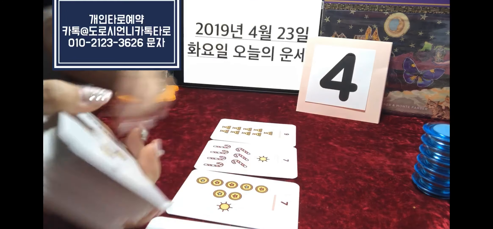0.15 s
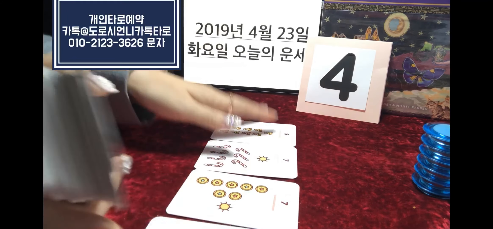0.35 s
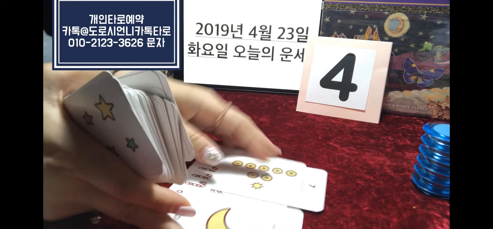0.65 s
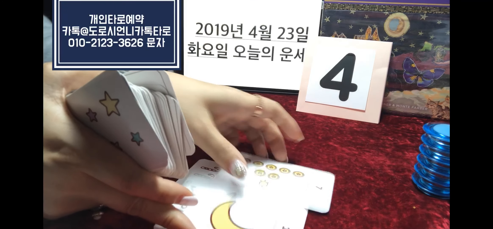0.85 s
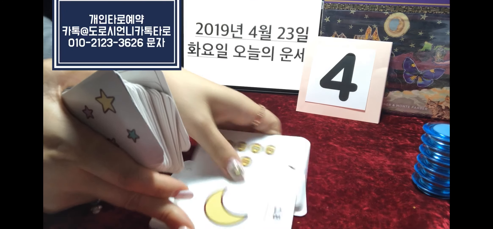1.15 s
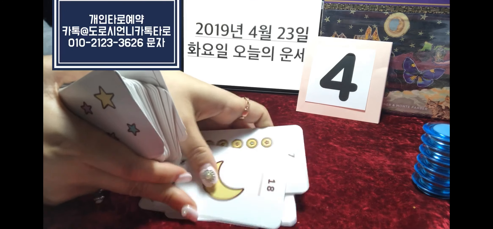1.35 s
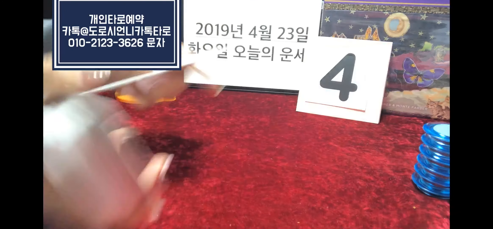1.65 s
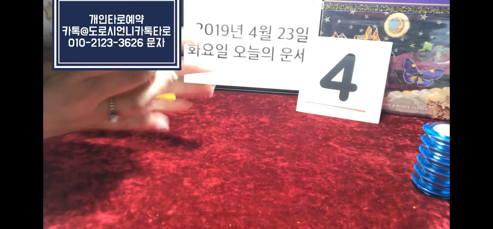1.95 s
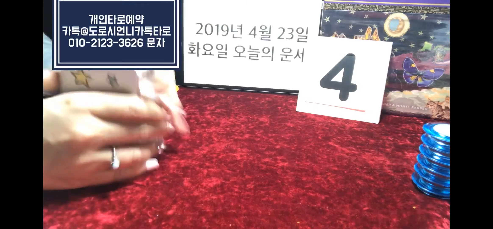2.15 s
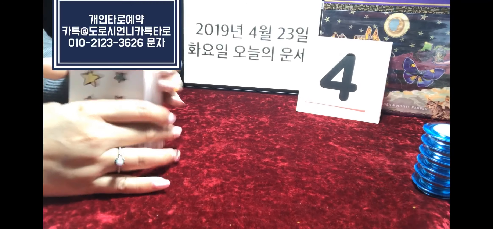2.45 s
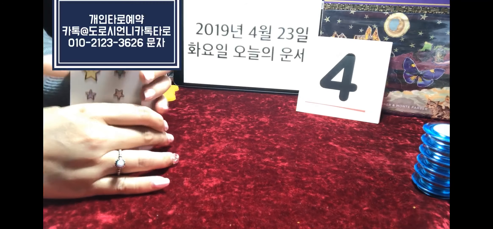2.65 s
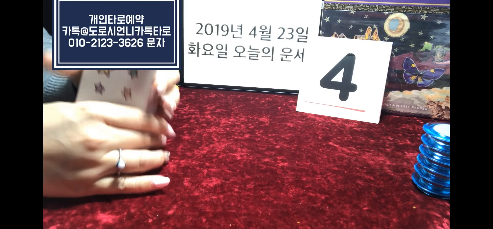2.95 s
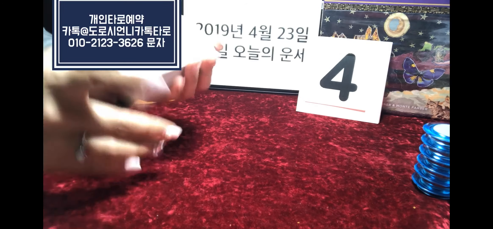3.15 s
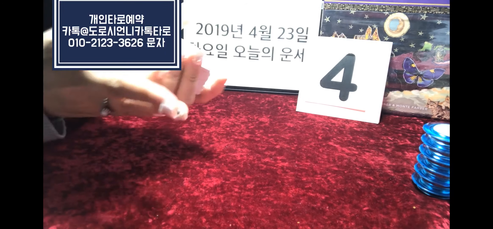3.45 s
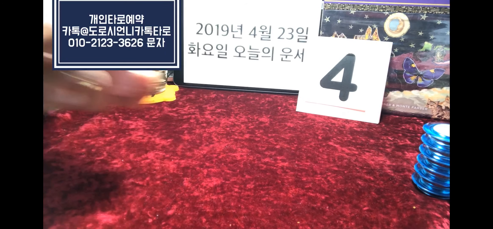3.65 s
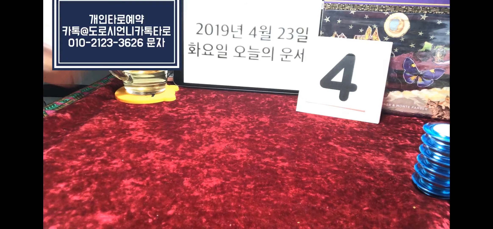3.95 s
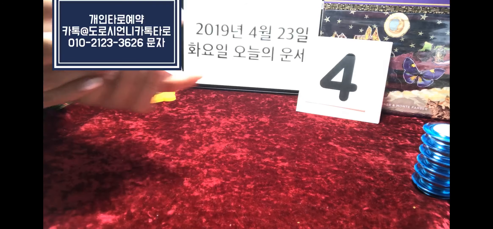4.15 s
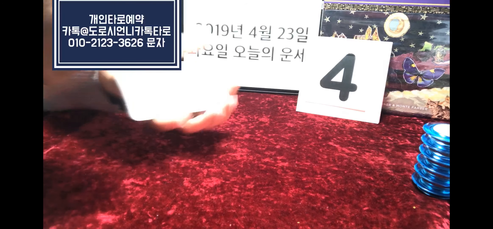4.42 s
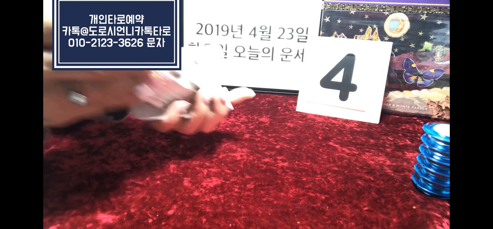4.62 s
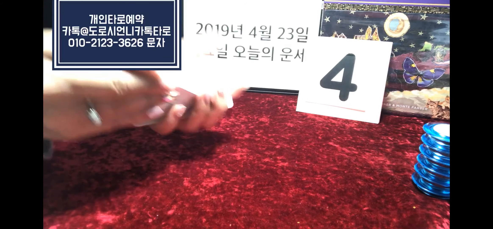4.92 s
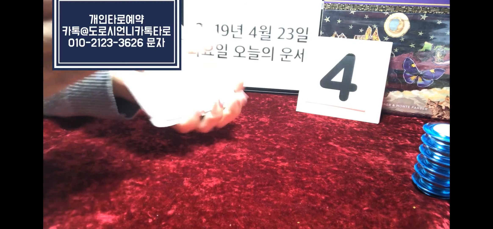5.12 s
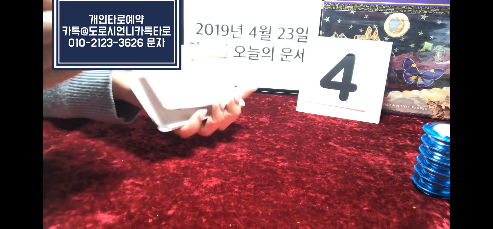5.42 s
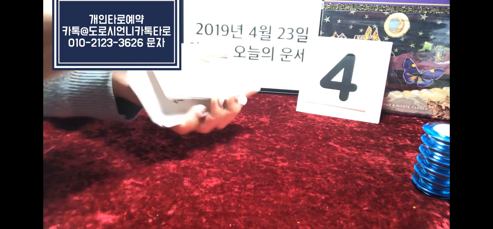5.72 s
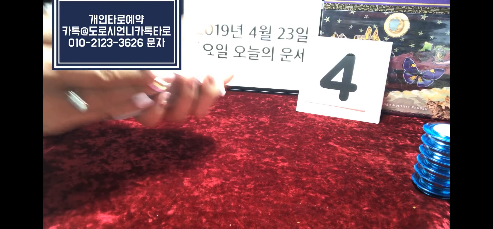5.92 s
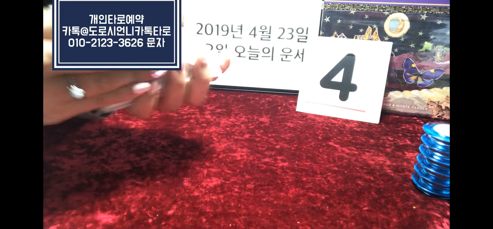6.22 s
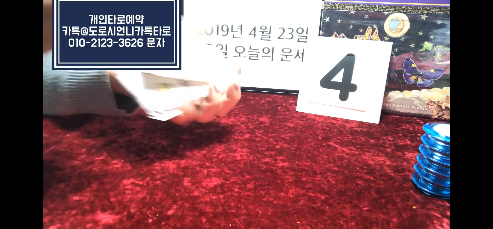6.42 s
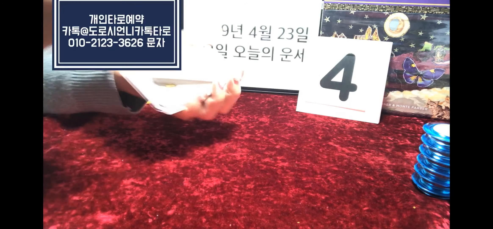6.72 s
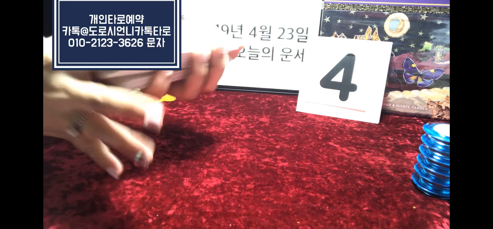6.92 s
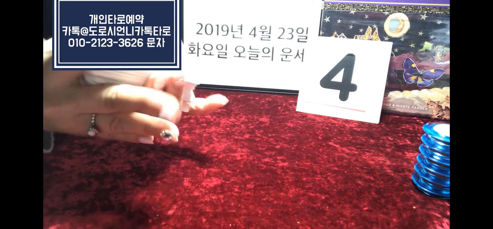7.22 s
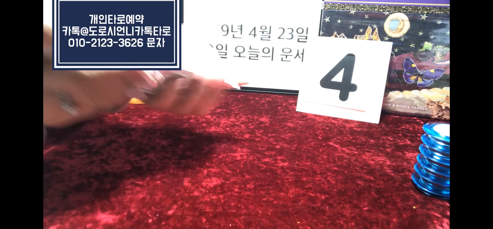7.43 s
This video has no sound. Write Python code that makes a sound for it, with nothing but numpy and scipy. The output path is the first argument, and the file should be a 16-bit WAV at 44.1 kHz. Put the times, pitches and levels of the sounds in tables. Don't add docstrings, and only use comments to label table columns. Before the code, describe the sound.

Stiff cards are gathered on a cloth-covered table with loud snaps, scraping edges and dull sliding, then squared with heavy low thumps. Over a second of near quiet follows, holding only a small tick, faint hiss and low hum. Then come eight evenly spaced slaps of card packets, with airy pops, soft knocks, swishing draws and ticking corners. The sound is close and dry, with a slight small-room tail.

```python
import sys
import numpy as np
from scipy import signal
from scipy.fft import rfft, irfft
from scipy.io import wavfile
from scipy.ndimage import uniform_filter1d

SR = 44100
rng = np.random.default_rng(int(sys.argv[2]) if len(sys.argv) > 2 else 0)


def dump_mix(stems):
    frames = np.atleast_2d(stems).T
    limited = np.clip(frames, -1, 1)
    pcm = np.round(limited * 32767).astype(np.int16)
    wavfile.write(sys.argv[1], SR, pcm)


def level_to_linear(level):
    exponent = np.asarray(level, float) / 20
    return 10 ** exponent


N = 334278

# freq_hz, level_db
HISS_SPECTRUM = [(50, -32), (85, 1.5), (270, -3.5), (870, -10), (1800, -22.5), (3500, -20), (15800, -31.5),
                 (16300, -49.5)]
HISS_DB, HUM_HZ, HUM_DB = -68.5, 59.2, -67.8

# freq_hz, level_db
CARD_SPECTRUM = [(410, -21.5), (700, -2), (1080, -13), (1470, 2), (3290, -5.5), (4460, 0), (8410, -8.5),
                 (13200, -17), (15900, -16), (16500, -40.5)]
# freq_hz, level_db
CLOTH_SPECTRUM = [(53, -53), (90, -8), (226, -3.5), (420, -7), (533, -10), (1470, -24), (1870, -29.5),
                  (2780, -32.5), (4000, -43), (5200, -60), (8800, -120)]
# freq_hz, level_db
EDGE_SPECTRUM = [(260, -35), (450, -6), (810, -4.5), (3100, -2.5), (3710, -2.5), (10500, -11), (14400, -14),
                 (16500, -35)]
# freq_hz, level_db, t60_s
TABLE_MODES = [(121, 1, 0.11), (188.2, -6, 0.11), (282.3, 3, 0.047), (486, -6.5, 0.05), (717, -10, 0.04),
               (580, -12, 0.037), (92.9, -8.5, 0.13)]

# fastest_s, rise_s, fade_s, level_db, brightness_db_per_octave
CARD_SLIDES = [(.035, 0.059, 0.23, -57.5, -3.5), (0.102, .015, 0.13, -36.5, -2),
               (0.638, .33, .02, -56.5, -1), (.652, .02, 0.049, -50, -0.4), (.802, 0.24, .03, -56.5, -3),
               (1.027, .2, 0.022, -60, -4.5), (1.049, 0.027, 0.036, -38, 0.5), (1.076, 0.018, 1, -58, -1),
               (1.386, .5, 0.34, -51.5, -6.5), (1.561, 0.49, 0.035, -52.5, 1),
               (1.585, 0.0092, 0.11, -48, 0.5), (1.8, .075, 0.11, -48, -2.5), (1.873, .07, 0.096, -48.5, 0),
               (2.06, 0.18, .2, -61.5, -1.5), (2.155, .046, 0.19, -49, 6), (2.416, 0.032, 0.13, -56, 5),
               (2.65, 0.73, .9, -74, 4), (3.159, 0.072, .55, -64, 0), (4.151, 0.3, 0.057, -65.5, -3),
               (4.337, .15, 0.024, -58, 5), (5.55, 0.26, 0.063, -58.5, 2), (6.83, 0.13, 0.146, -65, -3.5),
               (7.119, 0.032, 0.4, -58, 0.2), (7.555, 0.31, 0.03, -56.5, 4)]
# fastest_s, rise_s, fade_s, level_db
CLOTH_RUBS = [(.12, 0.078, 0.19, -47.5), (.635, .7, 0.11, -67.5), (.794, 0.086, 0.24, -57),
              (.982, 0.026, 0.037, -39), (1.05, .048, 0.25, -48), (1.395, 0.19, 0.2, -44.5),
              (1.88, 0.29, 0.11, -48.5), (2.159, 0.024, 0.062, -25.5), (2.22, 0.13, 0.097, -39),
              (2.411, 0.017, 0.072, -30.5), (2.52, 0.086, .9, -64.5), (2.81, 0.031, 0.18, -62),
              (3.169, 0.14, 0.38, -54.5), (4.85, 0.091, 0.21, -55), (4.81, 0.38, 0.071, -59.5),
              (1.52, 0.16, 0.056, -50.5), (5.579, 0.056, 0.027, -51), (6.17, 0.37, 0.079, -58.5),
              (6.477, 0.43, 0.045, -58), (6.68, 0.021, 0.14, -67), (7.579, 0.32, 0.083, -71)]
# start_s, slap_db, sleeve_jolt_db, knock_db, knock_hz
LANDINGS = [
    (4.607, -41, -53, -46, 261),
    (4.962, -40.5, -53, -37, 264),
    (5.32, -30.5, -50.5, -42.5, 214),
    (5.657, -31.5, -50, -35.5, 307),
    (5.967, -30.5, -55, -33.5, 334),
    (6.286, -33, -53, -40.5, 339),
    (6.604, -34.5, -47, -38.5, 233),
    (6.915, -34.5, -43.5, -41, 232),
]
# fastest_s, fade_s, level_db
DRAWS = [
    (4.69, 0.068, -54),
    (5.108, 0.1, -53.5),
    (5.45, 0.056, -49),
    (5.789, 0.06, -52),
    (6.088, 0.096, -53),
    (6.391, 0.11, -51.5),
    (6.702, 0.067, -54),
    (6.949, 0.061, -53.5),
]

# start_s, peak_db, ring_hz, t60_s
GATHER_SNAPS = [(0.0887, -24, 2470, 0.018), (0.0947, -24.5, 2700, 0.012), (0.1025, -33, 2220, 0.01),
                (0.1067, -4, 3600, 0.004), (0.1085, -20, 3430, 0.008), (0.1497, -29, 2720, 0.012),
                (0.5049, -45.5, 3770, 0.032), (0.5705, -28, 3640, 0.0072), (0.5745, -34, 2400, 0.013),
                (0.6481, -33, 2800, 0.055), (0.6549, -22, 5500, 0.0071), (0.8726, -37, 4540, 0.013),
                (0.9703, -30.5, 3470, 0.0037), (1.0328, -51, 3530, 0.073), (1.0465, -41, 3900, 0.0022),
                (1.0526, -31, 4440, 0.0022), (1.369, -34, 6740, 0.02), (1.574, -24, 6350, 0.017),
                (1.5836, -24, 5900, 0.018), (1.7884, -34.5, 5600, 0.013), (1.851, -27, 2390, 0.011),
                (1.867, -20.5, 3770, 0.018), (1.8756, -31, 4060, 0.013)]
# start_s, peak_db, ring_hz, t60_s
LANDING_SNAPS = [(4.6056, -36, 3900, 0.014), (4.6123, -26.5, 3160, 0.023), (4.9615, -28.5, 3280, 0.0064),
                 (5.317, -28.5, 4300, 0.012), (5.6545, -31, 4040, 0.01), (5.9638, -33, 4500, 0.015),
                 (4.9668, -26.5, 4750, 0.0073), (5.325, -16, 4700, 0.0067), (5.326, -22, 3920, 0.0038),
                 (5.6556, -19.5, 2850, 0.038), (5.6612, -16.5, 4330, 0.0036), (5.6667, -21, 2410, 0.0034),
                 (5.9729, -27, 4640, 0.0028), (5.9902, -40, 7500, 0.024), (6.284, -40, 4080, 0.012),
                 (6.2888, -27.5, 4030, 0.025), (6.6026, -24, 4260, 0.0049), (6.6147, -26.5, 4100, 0.013),
                 (6.6175, -29.5, 3730, 0.022), (6.913, -40, 3080, 0.015), (6.924, -19.5, 4640, 0.0048),
                 (6.9309, -31.5, 3530, 0.035)]
# start_s, peak_db, ring_hz
SCOOP_EDGES = [
    (1.157, -45.5, 3000),
    (1.2994, -46, 2500),
    (1.318, -42, 2000),
    (1.3636, -39, 2500),
    (1.38, -43, 2500),
    (1.3872, -37, 5000),
    (1.407, -44, 5000),
    (1.4164, -42, 2000),
    (1.4456, -39, 2500),
    (1.518, -48, 2400),
]
# start_s, snap_db, ring_hz, pop_db
FLICKS = [
    (5.1676, -35, 3120, -35.5),
    (5.5, -30.5, 5200, -32),
    (5.5561, -36, 4550, -47),
    (5.8188, -52, 3020, -44.5),
    (5.8805, -40.5, 3600, -41.5),
    (6.1356, -38, 3070, -41.5),
    (6.167, -30.5, 6300, -37),
    (6.4522, -30.5, 2940, -41),
    (6.762, -36, 4170, -44),
]
# start_s, peak_db, ring_hz
TICKS = [(0.266, -51, 2550), (0.41, -48.5, 2620), (0.488, -51.5, 2830), (0.8008, -46, 3300),
         (0.9665, -47, 4000), (0.995, -50, 3000), (0.988, -46, 2840), (1.116, -42, 3880),
         (1.2273, -43.5, 3250), (1.705, -50, 3580), (1.8047, -50, 3080), (2.05, -46.5, 4200),
         (2.2197, -48, 3360), (2.6452, -49, 5460), (3.3894, -43.5, 4590)]
# start_s, peak_db, ring_hz
CORNER_CATCHES = [(0.808, -48, 2470), (2, -47.5, 2900), (4.5005, -49.5, 3350), (4.7822, -53, 3010),
                  (4.822, -52, 4460), (4.835, -55, 2000), (4.8892, -52, 3000), (4.9132, -46, 2140),
                  (4.803, -43.5, 3260), (4.905, -38.5, 4470), (5.079, -38.5, 3250), (5.219, -47, 3460),
                  (5.2286, -52, 4000), (5.2477, -56, 2600), (5.582, -45.5, 2640), (5.8545, -48.5, 2700),
                  (6.0696, -42.5, 1700), (6.11, -42.5, 4040), (6.4749, -46.5, 2630), (6.5595, -40, 3550),
                  (6.509, -62, 5000), (6.527, -67, 4460), (6.59, -37, 4600), (6.694, -39.5, 3540),
                  (6.8127, -54, 3000), (6.845, -49, 2010), (7.0045, -46.5, 2940), (7.111, -52, 4580)]

# start_s, peak_db, ring_hz, t60_s
GATHER_POPS = [(0.09, -23, 773, 0.019), (0.107, -30, 1100, 0.018), (0.1511, -21, 456, 0.013),
               (0.6524, -34.5, 1328, 0.0051), (0.8747, -33, 1250, 0.0038), (0.9716, -30, 995, 0.015),
               (0.9781, -33, 398, 0.07), (1.0347, -31, 1250, 0.016), (1.05, -30, 990, 0.015),
               (1.11, -40, 1495, 0.041), (1.7163, -43, 673, 0.049), (1.8064, -39, 1010, 0.013),
               (1.851, -25, 1210, 0.0078), (1.8674, -28, 597, 0.0035), (1.8775, -29.5, 840, 0.018),
               (2.138, -28, 406, 0.012), (2.1475, -24, 1137, 0.041), (2.1585, -11.5, 550, 0.036),
               (2.1764, -16.5, 568, 0.021), (2.1843, -21.5, 516, 0.018), (2.1909, -27, 717, 0.03),
               (2.2018, -22, 444, 0.0052), (2.4041, -23.5, 486, 0.033), (2.4138, -27, 550, 0.041),
               (2.4199, -20.5, 555, 0.018), (1.79, -37.5, 510, 0.015), (2.1565, -25, 1670, 0.017),
               (2.1755, -41, 1405, 0.02), (2.1915, -39, 1300, 0.012), (2.202, -40, 1370, 0.017),
               (2.2515, -51, 506, 0.03), (2.4035, -45, 1250, 0.02), (2.4145, -39, 1267, 0.03),
               (2.421, -44.5, 1290, 0.033), (2.44, -52, 910, 0.019), (2.8, -49.5, 460, 0.023),
               (3.081, -50, 450, 0.02)]
# start_s, peak_db, ring_hz, t60_s
LANDING_POPS = [(4.6119, -23.5, 725, 0.009), (4.96, -26, 1290, 0.017), (4.9713, -25, 613, 0.028),
                (5.3299, -15.5, 710, 0.014), (5.6572, -17.5, 917, 0.029), (5.6644, -22.5, 720, 0.03),
                (5.9736, -22.5, 502, 0.034), (6.2912, -20.5, 804, 0.016), (6.2975, -25.5, 493, 0.006),
                (6.6128, -27.5, 760, 0.034), (6.9235, -26, 480, 0.04), (5.326, -26, 488, 0.03),
                (5.666, -24.5, 486, 0.04), (5.971, -28.5, 1520, 0.023), (5.979, -28.5, 403, 0.035),
                (6.607, -33, 480, 0.035), (4.612, -38.5, 1540, 0.012), (5.6585, -25, 1590, 0.0098),
                (4.968, -32, 1580, 0.022), (5.521, -49, 603, 0.02), (5.563, -41.5, 520, 0.033),
                (4.976, -35.5, 231, 0.044), (5.335, -31, 240, 0.046), (6.173, -41, 200, 0.049)]
# loudest_s, length_s, level_db, band_hz, width_hz
SCRAPES = [(0.123, 0.035, -38.5, 6700, 2500), (0.134, 0.0085, -43, 2200, 500),
           (0.14, 0.013, -36, 2670, 400), (0.143, 0.012, -38.5, 3600, 400),
           (0.509, 0.026, -54.5, 3000, 2500), (0.586, .08, -60, 6000, 4000),
           (1.037, .016, -43.5, 2980, 3000), (1.114, 0.031, -49.5, 2500, 2500),
           (1.285, 0.085, -55.5, 4900, 2500), (1.383, 0.04, -45.5, 1570, 400),
           (1.373, 0.026, -51, 6500, 4000), (1.51, .06, -59, 1890, 500), (1.602, 0.03, -51.5, 890, 200),
           (1.602, 0.055, -56.5, 6030, 3470), (2.033, 0.024, -61, 5960, 3000),
           (2.033, 0.015, -55.5, 700, 200), (2.058, 0.031, -58, 4230, 1500), (2.034, 0.28, -72, 4040, 600),
           (4.625, 0.021, -43.5, 5430, 4000), (4.696, 0.033, -58, 7500, 2000),
           (4.683, 0.029, -60, 2980, 500), (4.738, 0.037, -59, 2800, 600),
           (5.048, 0.047, -51.5, 6000, 3000), (5.123, 0.062, -51.5, 4760, 700),
           (5.394, 0.03, -42.5, 5870, 1500), (5.452, 0.037, -40, 8950, 4030),
           (5.713, .025, -49.5, 2200, 900), (5.736, 0.029, -45.5, 5500, 4500), (5.79, .06, -65, 5000, 2500),
           (5.993, .012, -45.5, 10000, 4000), (6.041, 0.048, -48, 4030, 2550),
           (6.032, .03, -52.5, 2900, 400), (6.128, 0.03, -53, 8000, 4000), (6.306, 0.023, -51, 2500, 2500),
           (6.396, 0.037, -53, 4400, 606), (6.389, 0.083, -61, 7000, 2500), (6.689, 0.041, -51, 4200, 1500),
           (6.842, 0.043, -70, 5500, 4000), (6.947, 0.039, -45.5, 6500, 5000),
           (7.137, 0.072, -58, 4940, 4050)]
# start_s, peak_db, pitch_hz (set by contact size)
KNOCKS = [(0.1474, -42, 330), (0.51, -45.5, 120), (0.878, -48, 128), (0.9788, -36.5, 174),
          (1.0593, -32.5, 170), (1.5283, -47, 127), (1.6463, -49, 121), (2.17, -18, 120),
          (2.2517, -39.5, 146), (2.402, -27, 310), (2.411, -23.5, 152), (2.4539, -33.5, 126.5),
          (2.6581, -47, 121), (2.8, -47, 214.3), (2.8114, -29.5, 120.1), (3.0828, -41, 174),
          (3.081, -47, 329), (2.335, -56, 130), (0.19, -52, 200), (0.78, -53, 140), (0.62, -55.5, 140)]

STROKE_DB = 30
APPROACH_RISE_S, APPROACH_DB, APPROACH_TILT_DB = 0.43, -73.5, 1.6
SLAP_RISE_S, SLAP_FADE_S, SLAP_TILT_DB = 0.003, 0.054, -1.5
DRAW_RISE_S, DRAW_START_TILT_DB, DRAW_TOP_TILT_DB = 0.13, -2.1, 4.0
LINGER_DB, LINGER_FADE_S, LINGER_TILT_DB = -11.5, 0.39, -2
JOLT_DELAY_S, JOLT_RISE_S, JOLT_FADE_S = 0.025, 0.015, 0.072
CARD_REST_DB, CLOTH_REST_DB, FLUTTER_DB = -80.5, -80.5, 1.1
FLAP_HZ, FLAP_OCTAVES_PER_DB, FLAP_WIDTH_OCTAVES, FLAP_DB = 3600, 2, 1, 4.5
FLICK_T60_S, REBOUND_S, REBOUND_DB = 0.0079, 0.0035, -12.5
FLICK_POP_DELAY_S, FLICK_POP_HZ, FLICK_POP_T60_S = 0.0013, 635, 0.022
PALM_DELAY_S, PALM_HZ, PALM_DB = 0.00304, 470, -3
FACE_HZ, FACE_DB = 1636, -2.5
CATCH_POP_DB, CRACK_RISE_S, POP_TOP_HZ = -7, 0.00012, 2330
KNOCK_DELAY_S, BODY_FROM_HZ = 0.00745, 75


def evened(x):
    return x / np.sqrt(np.mean(x ** 2) + 1e-20)


def read(points, hz):
    point_hz, value = np.transpose(points)
    return np.interp(np.log(hz + 1), np.log(point_hz + 1), value)


def add(mix, start_s, sound):
    part = mix[max(round(start_s * SR), 0):][:len(sound)]
    part += sound[:len(part)]


def drift(hz):
    return evened(signal.lfilter(*signal.butter(2, hz, fs=SR), rng.standard_normal(N)))


def causal(points):
    log_gain = np.log(level_to_linear(read(points, abs(np.fft.fftfreq(4096, 1 / SR)))))
    phase = signal.hilbert(log_gain).imag
    taps = np.fft.ifft(np.exp(log_gain - 1j * phase)).real[:1024]
    return taps / np.linalg.norm(taps)


def resonate(x, hz, width_hz):
    return signal.lfilter(*signal.iirpeak(np.clip(hz, 50, 15000), max(hz / width_hz, .3), fs=SR), x)


def noise(points, patchy_db, tilt_db=0., comb_db=0., flap_db=0.):
    frames = N // 128 + 5
    hz = np.fft.rfftfreq(512, 1 / SR)[:, None]
    real, imag, patches = rng.standard_normal((frames, 257, 3)).T
    patches = uniform_filter1d(patches, size=5, axis=0)
    patches = evened(uniform_filter1d(patches, size=18, axis=1))
    t = np.arange(frames) * 128
    bright = np.interp(t, np.arange(N), tilt_db * np.ones(N))
    flap_octaves = np.log2((hz + 1) / FLAP_HZ) - FLAP_OCTAVES_PER_DB * bright
    flap = np.exp(-(flap_octaves / FLAP_WIDTH_OCTAVES) ** 2)
    tilt = bright * np.log2((hz + 100) / 5000) + flap_db * flap
    gap_s = 0.00013 * level_to_linear(2.0 * drift(5.8)[np.minimum(t, N - 1)])
    comb = comb_db * np.cos(2 * np.pi * hz * gap_s)
    shape = level_to_linear(read(points, hz) + tilt + comb)
    shape = shape / np.sqrt((shape ** 2).mean(0)) * level_to_linear(patchy_db * patches)
    return evened(signal.istft((real + 1j * imag) * shape, nperseg=512, noverlap=384)[1][:N])


def stroke(top_s, rise_s, fade_s, db, order=1):
    t = np.arange(N * 1000 // SR + 1) / 1000 - top_s
    return level_to_linear(db - STROKE_DB * np.maximum(-t / rise_s, t / fade_s) ** order) ** 2


def fine(x):
    return np.interp(np.arange(N) / SR, np.arange(len(x)) / 1000, x)


def floor():
    hz = np.fft.rfftfreq(N, 1 / SR)
    hiss = irfft(rfft(rng.standard_normal(N)) * level_to_linear(read(HISS_SPECTRUM, hz)), N)
    phase = 2 * np.pi * np.cumsum(HUM_HZ + .7 * drift(4.0)) / SR
    hum = np.sin(phase) * level_to_linear(HUM_DB + 3 + .8 * drift(5.0))
    return level_to_linear(HISS_DB) * evened(hiss) + hum


def card_motion():
    parts = [(stroke(*row[:4]), row[4]) for row in CARD_SLIDES]
    t = np.arange(len(parts[0][0])) / 1000
    for (s, slap_db, *_), (top_s, fade_s, db) in zip(LANDINGS, DRAWS):
        approach = stroke(s, APPROACH_RISE_S, SLAP_RISE_S, APPROACH_DB)
        slap = stroke(s, SLAP_RISE_S, SLAP_FADE_S, slap_db)
        draw = stroke(top_s, DRAW_RISE_S, fade_s, db, order=2) * (t > s)
        draw_tilt = np.interp(t, [s, top_s], [DRAW_START_TILT_DB, DRAW_TOP_TILT_DB])
        linger = stroke(top_s, SLAP_RISE_S, LINGER_FADE_S, db + LINGER_DB)
        parts += [(approach, APPROACH_TILT_DB), (slap, SLAP_TILT_DB)]
        parts += [(draw, draw_tilt), (linger, LINGER_TILT_DB)]
    power = sum(p for p, _ in parts) + level_to_linear(CARD_REST_DB) ** 2
    tilt_db = sum(p * tilt for p, tilt in parts) / power
    return fine(np.sqrt(power)), fine(tilt_db)


def cloth_motion():
    jolts = [(s + JOLT_DELAY_S, JOLT_RISE_S, JOLT_FADE_S, db) for s, _, db, *_ in LANDINGS]
    power = sum(stroke(*row) for row in CLOTH_RUBS + jolts)
    return fine(np.sqrt(power + level_to_linear(CLOTH_REST_DB) ** 2))


def slides():
    gain, tilt_db = card_motion()
    gain = gain * level_to_linear(FLUTTER_DB * drift(18.0))
    catch_db = 1.4 * drift(40.0) + 1.8 * drift(300.0)
    hiss = noise(CARD_SPECTRUM, 3.2, tilt_db, comb_db=-0.5, flap_db=FLAP_DB) * level_to_linear(catch_db)
    trip_gain = level_to_linear(3.5 * np.minimum(rng.exponential(1, N), 1.6))
    trips = (rng.random(N) < 300 / SR) * trip_gain
    spent = signal.lfilter([1], [1, -np.exp(-1 / (.0012 * SR))], trips) * rng.standard_normal(N)
    crackle = signal.oaconvolve(spent, causal(EDGE_SPECTRUM))[:N]
    card = (hiss + level_to_linear(-2.5) * crackle) * gain
    cloth = noise(CLOTH_SPECTRUM, 2.5) * cloth_motion() * level_to_linear(1.6 * drift(30.0))
    return card + cloth


def edges():
    small = [(*row, .007) for row in SCOOP_EDGES]
    small += [(*row[:3], FLICK_T60_S) for row in FLICKS]
    small += [(*row, .012) for row in TICKS + CORNER_CATCHES]
    chance = rng.random((len(small), 3))
    again = [(s + REBOUND_S * (.5 + a), db + REBOUND_DB * (.5 + b), hz * (.5 + c), t60)
             for (s, db, hz, t60), (a, b, c) in zip(small, chance)]
    return GATHER_SNAPS + LANDING_SNAPS + small + again


def snaps():
    out, t = np.zeros(N), np.arange(3000) / SR
    rows = edges()
    edge = causal(EDGE_SPECTRUM)
    for (s, db, hz, t60), fizz in zip(rows, rng.standard_normal((len(rows), len(t)))):
        crack = fizz * (1 - np.exp(-t / CRACK_RISE_S)) + 2.2 * (t == 0)
        burst = crack * level_to_linear(-60 * t / max(t60, .003))
        ringing = burst + 2.2 * resonate(burst, hz, .35 * hz)
        sound = signal.fftconvolve(ringing, edge)[:len(t)]
        peak = np.sqrt(uniform_filter1d(sound ** 2, size=36).max())
        add(out, s + .0001, level_to_linear(db - 2.0) * sound / peak)
    return out


def pops():
    out, t = np.zeros(N), np.arange(4000) / SR
    rows = GATHER_POPS + LANDING_POPS
    for s, _, _, db in FLICKS:
        rows = rows + [(s + FLICK_POP_DELAY_S, db, FLICK_POP_HZ, FLICK_POP_T60_S),
                       (s + PALM_DELAY_S, db + PALM_DB, PALM_HZ, FLICK_POP_T60_S),
                       (s, db + FACE_DB, FACE_HZ, FLICK_POP_T60_S)]
    rows = rows + [(s + FLICK_POP_DELAY_S, db + CATCH_POP_DB, hz / 5.72, FLICK_POP_T60_S)
                   for s, db, hz in CORNER_CATCHES]
    for (s, db, hz, t60), puff in zip(rows, rng.standard_normal((len(rows), len(t)))):
        swell = (1 - np.exp(-t / 0.001)) * level_to_linear(-60 * t / max(t60, .006))
        phase = 2 * np.pi * hz * np.cumsum(0.85 + .8 * np.exp(-t / .002)) / SR
        rough = resonate(resonate(puff, hz, .9 * hz), hz, 1.2 * hz)
        sound = swell * (np.sin(phase) + evened(rough))
        sound = signal.lfilter(*signal.butter(6, min(2.6 * hz, POP_TOP_HZ), fs=SR), sound)
        add(out, s - .0006, level_to_linear(db + 1.0) * sound / abs(sound).max())
    return out


def scrapes():
    out = np.zeros(N)
    chance = rng.standard_normal((len(SCRAPES), 2, 20000))
    for (s, length_s, db, hz, width_hz), (fizz, grit) in zip(SCRAPES, chance):
        count = min(int(1.6 * length_s * SR), 20000)
        t = np.arange(count) / SR / (.8 * length_s) - 1
        grit_db = 3.0 * evened(uniform_filter1d(grit, size=60))[:count]
        drive = fizz[:count] * level_to_linear(grit_db)
        band = resonate(resonate(drive, hz, 1.5 * width_hz), hz, 1.5 * width_hz)
        add(out, s - .8 * length_s, level_to_linear(db - STROKE_DB * t ** 2) * evened(band))
    return out


def knocks():
    out, t = np.zeros(N), np.arange(9000) / SR
    turn = 2 * np.pi * np.cumsum(1 + .6 * np.exp(-t / .003)) / SR
    rows = KNOCKS + [(s + KNOCK_DELAY_S, db, hz) for s, *_, db, hz in LANDINGS]
    for (s, db, spot_hz), spot in zip(rows, rng.standard_normal((len(rows), len(TABLE_MODES)))):
        sound = np.zeros(len(t))
        for (hz, mode_db, t60), chance in zip(TABLE_MODES, spot):
            off_db = 9.0 * abs(np.log2(hz / spot_hz))
            decay = level_to_linear(mode_db + 2.0 * chance - off_db - 60 * t / t60)
            sound += decay * np.sin(hz * (1 + .012 * chance) * turn)
        sound *= 1 - np.exp(-t / 0.0022)
        add(out, s - .003, level_to_linear(db + 6.0) * sound / abs(sound).max())
    return out


def room(x):
    hz, t, z = signal.stft(rng.standard_normal(SR // 3), SR, nperseg=128)
    t60 = read([(300, 0.21), (12000, 0.14)], hz)[:, None]
    tail = signal.istft(z * level_to_linear(-60 * t / t60), SR, nperseg=128)[1]
    tail[:150] = 0
    return signal.fftconvolve(x, tail / np.linalg.norm(tail))[:N]


def scene():
    body = signal.butter(2, BODY_FROM_HZ, "high", fs=SR, output="sos")
    blows = signal.sosfilt(body, pops() + knocks())
    near = slides() + snaps() + blows + scrapes()
    return (near + level_to_linear(-20.5) * room(near) + floor())[None]


def roll_off(x):
    return signal.sosfilt(signal.butter(12, 17000, fs=SR, output="sos"), x)


def record(dry):
    mix = signal.sosfilt(signal.butter(3, 45, "high", fs=SR, output="sos"), dry)
    mix = .9 * np.tanh(mix / .9)
    lowpass = signal.firwin(255, 16400, window=("kaiser", 9), fs=SR)
    mix = signal.oaconvolve(mix, lowpass[None], "same")
    return roll_off(mix)


dry = scene()
out = record(dry)
dump_mix(out)
```